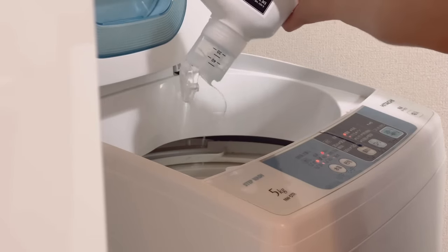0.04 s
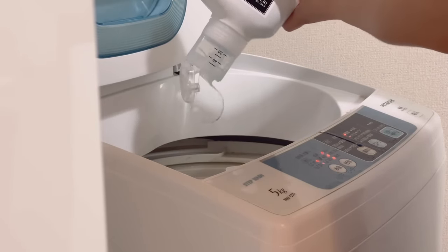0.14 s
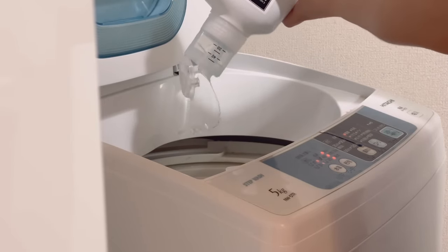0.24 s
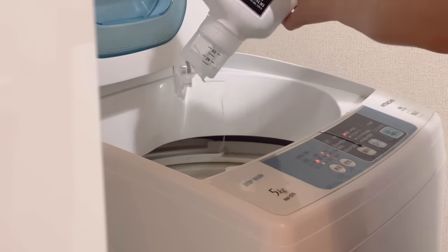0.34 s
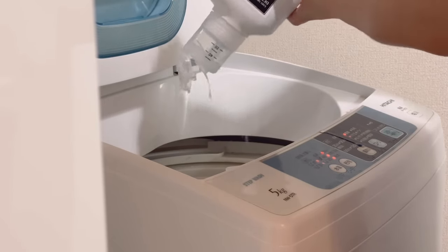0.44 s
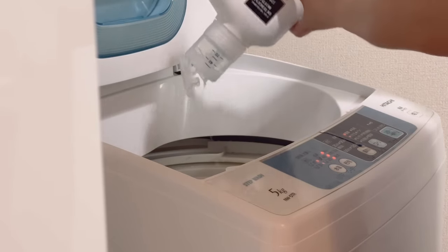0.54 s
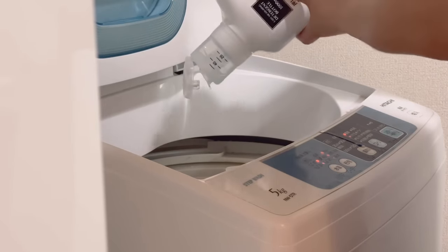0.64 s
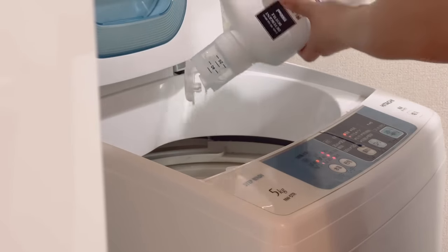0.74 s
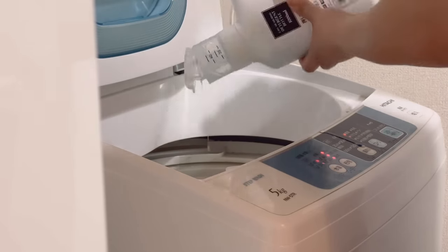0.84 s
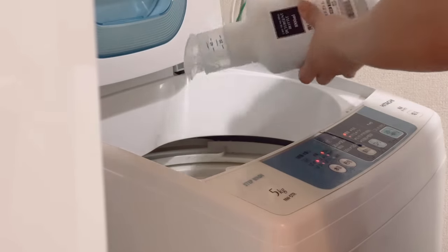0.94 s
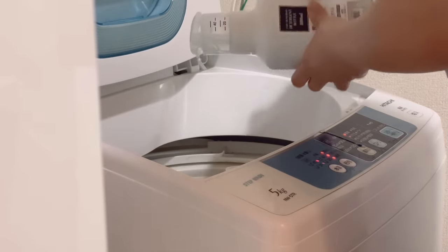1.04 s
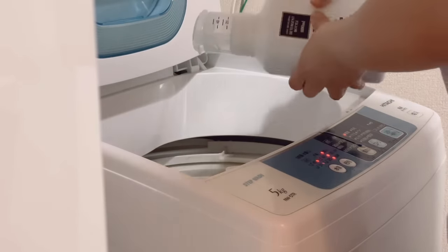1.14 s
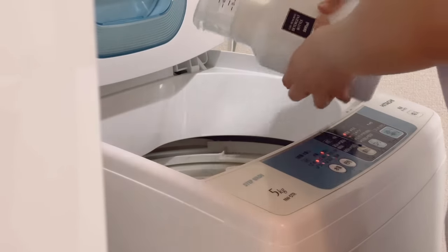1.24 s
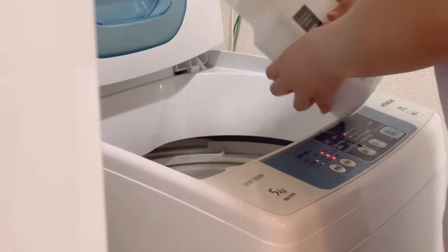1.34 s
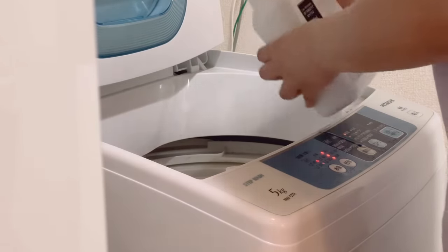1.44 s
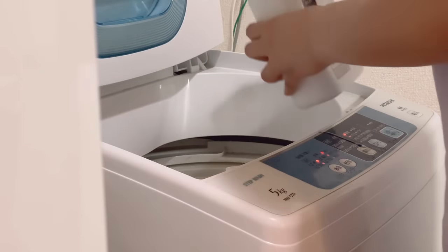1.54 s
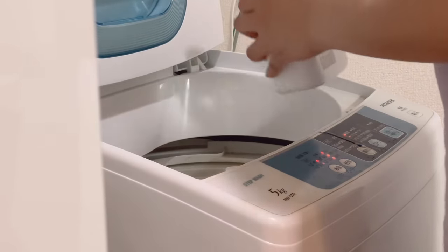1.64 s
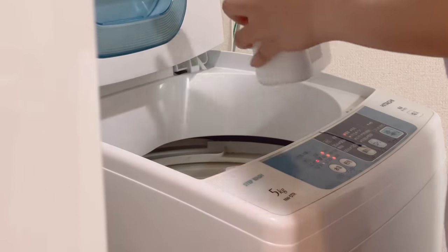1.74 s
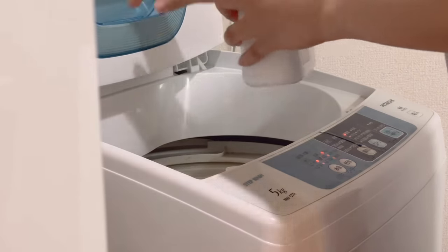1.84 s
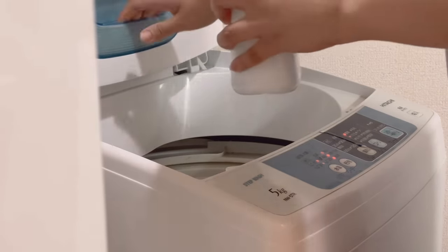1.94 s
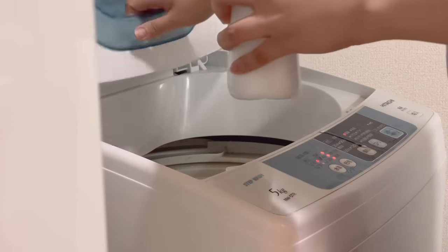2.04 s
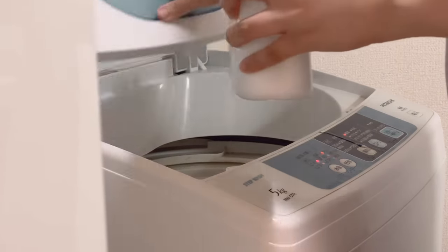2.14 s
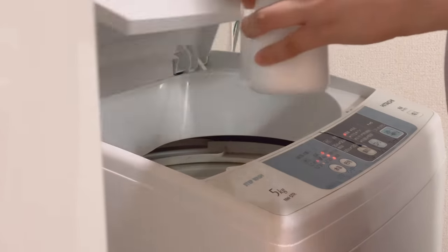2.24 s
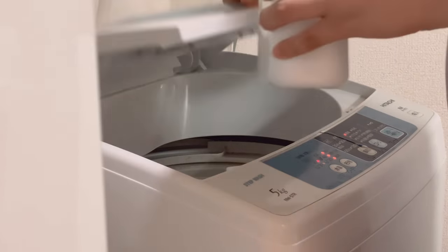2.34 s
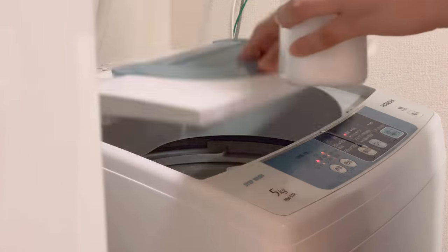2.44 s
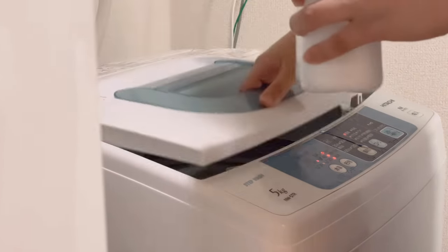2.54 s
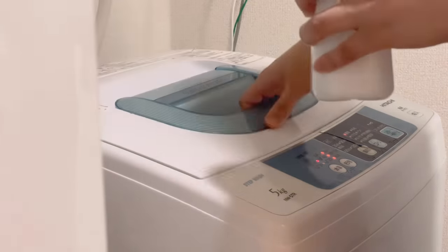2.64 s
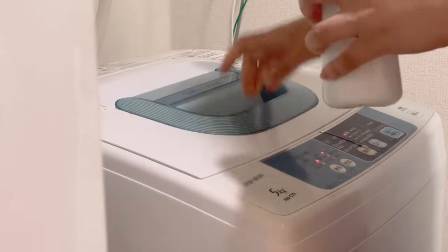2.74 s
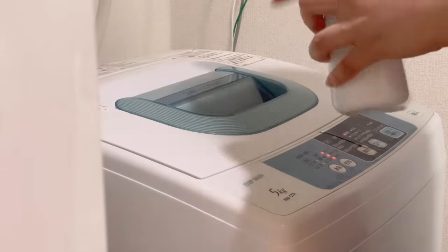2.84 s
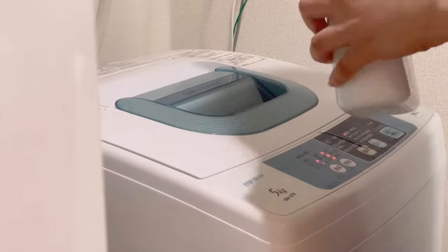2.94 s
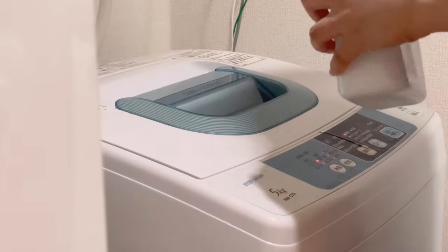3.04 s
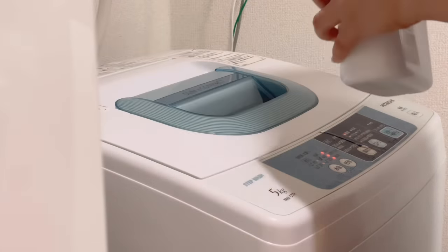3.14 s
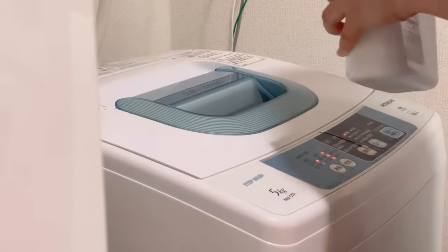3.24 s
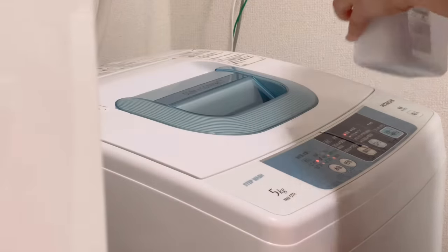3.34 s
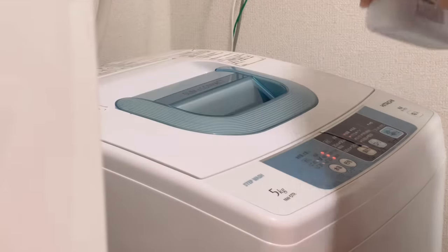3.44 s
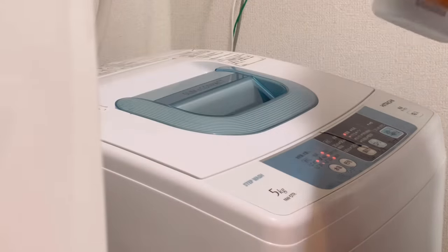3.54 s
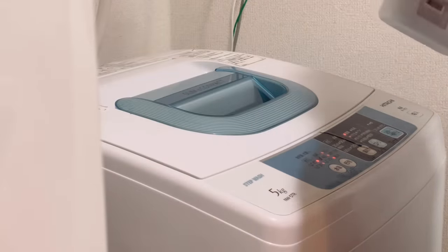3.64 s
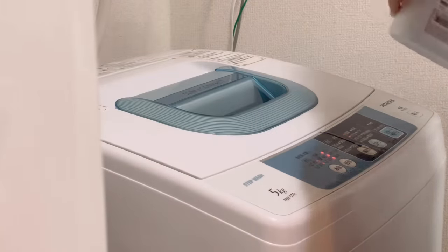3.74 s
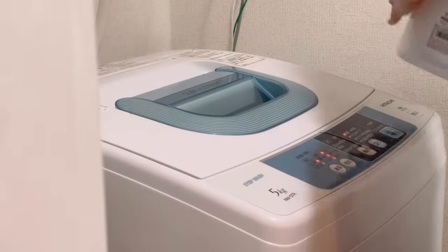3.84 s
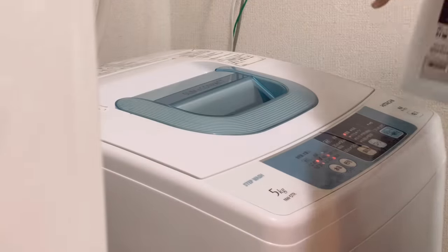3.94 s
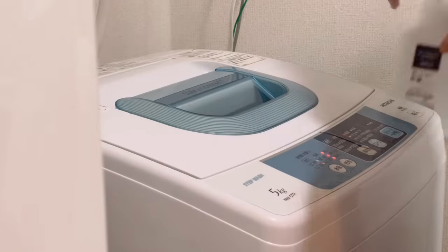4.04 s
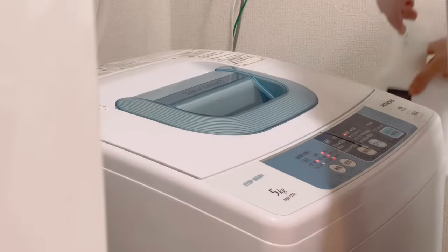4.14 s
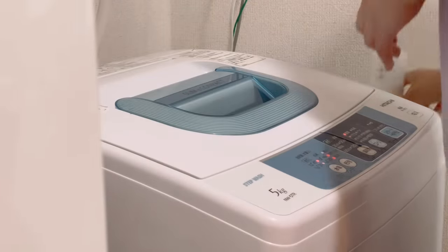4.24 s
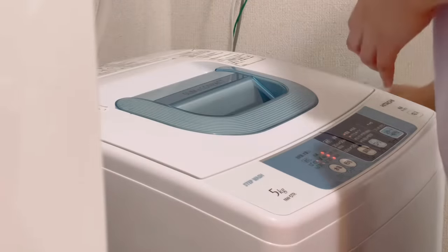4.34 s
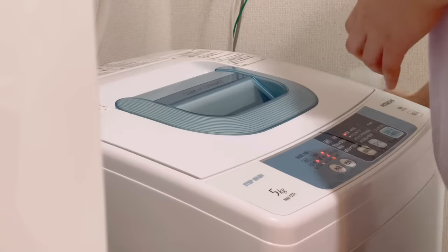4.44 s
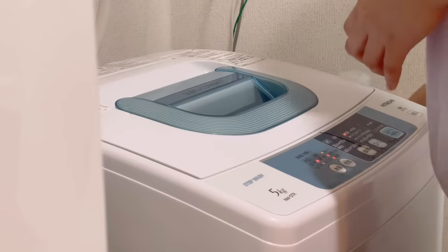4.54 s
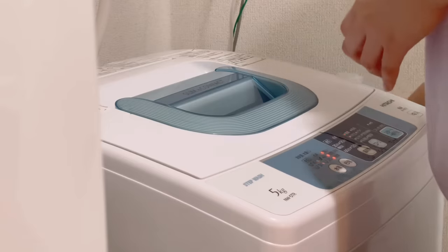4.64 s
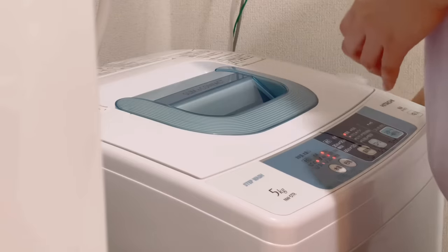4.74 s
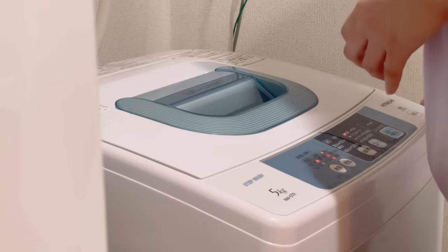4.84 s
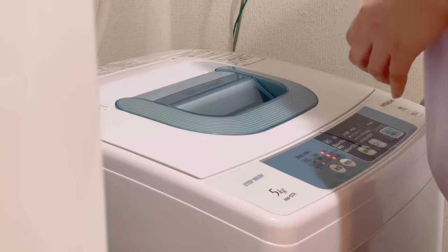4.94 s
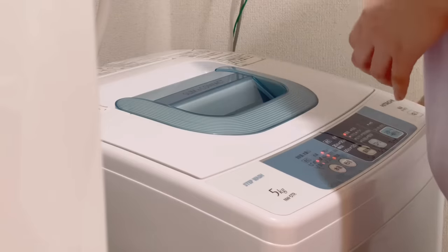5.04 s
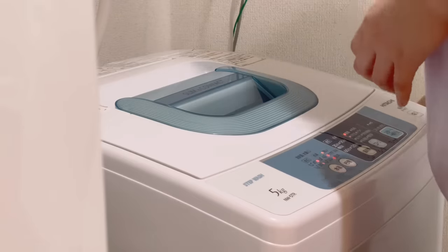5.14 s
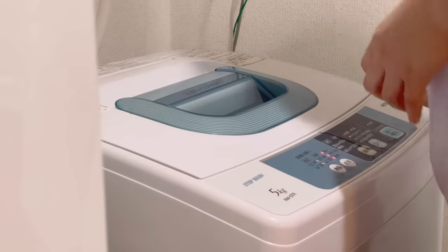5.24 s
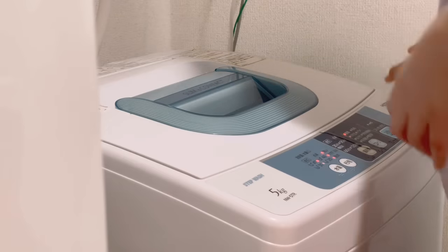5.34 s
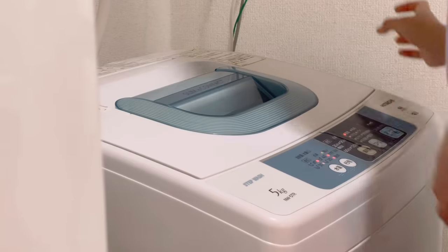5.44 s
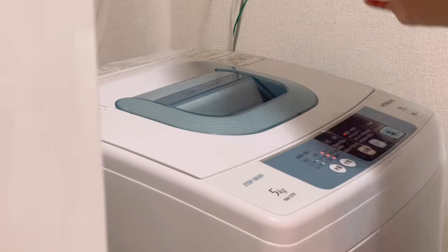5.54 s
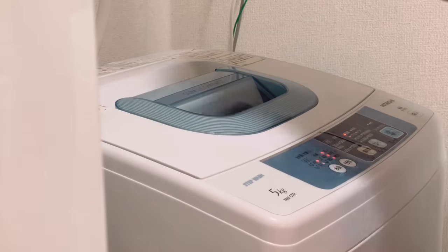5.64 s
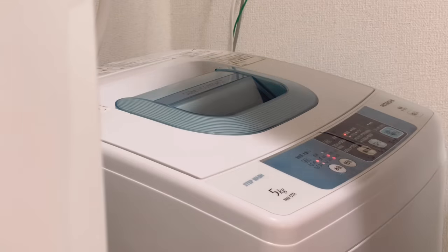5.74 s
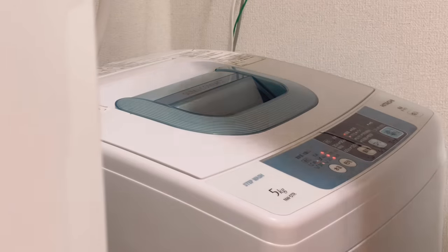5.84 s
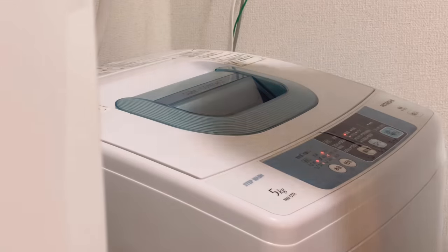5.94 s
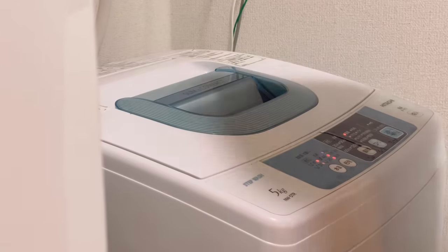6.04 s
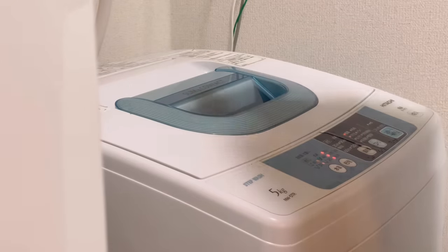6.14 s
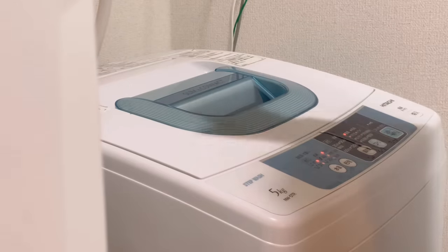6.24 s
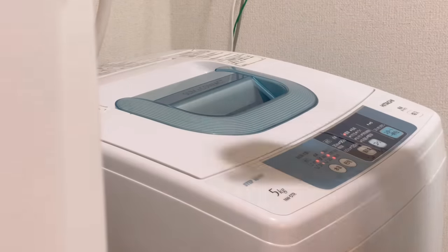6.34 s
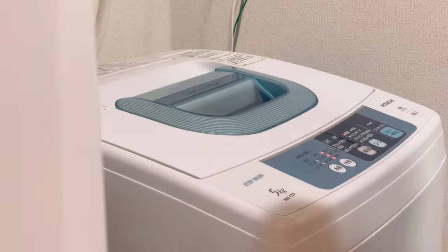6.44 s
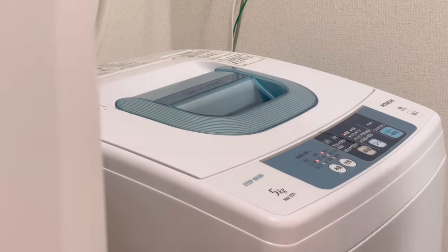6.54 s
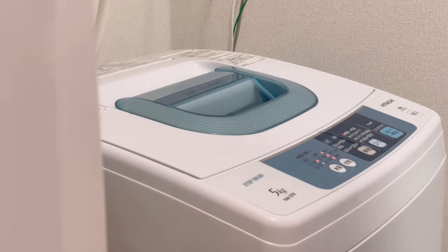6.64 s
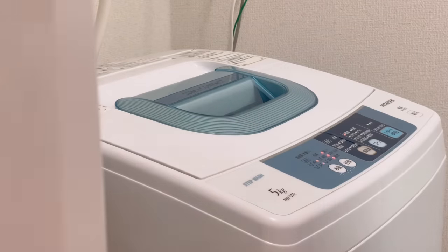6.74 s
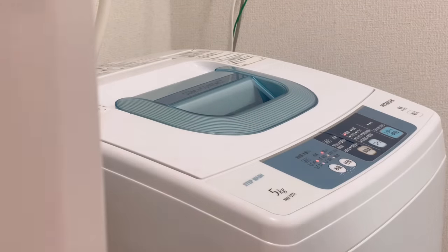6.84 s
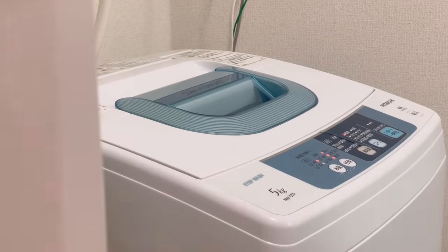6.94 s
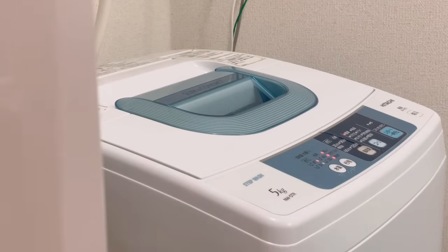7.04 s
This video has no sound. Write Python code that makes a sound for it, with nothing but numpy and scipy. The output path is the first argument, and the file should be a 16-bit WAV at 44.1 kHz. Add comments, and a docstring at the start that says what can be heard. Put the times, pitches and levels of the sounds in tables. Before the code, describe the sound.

A plastic bottle gulps and wheezes, a washing machine lid clatters shut, then water hoots briefly and sprays into the humming tub amid bumps and clicks.

```python
"""A plastic bottle gulps: bubbles ring as decaying tones, and air drawn through its spout hisses and whistles.
It knocks on a top-loading washing machine whose lid clatters shut: ringing modes and noise bands under each blow.
The inlet valve opens and the pipe hoots; coloured noise and small pings spray into the humming tub.
The bottle is put aside with dull bumps, rasps and clicks.
All is heard from a phone close by in a small, hard-walled laundry room, over a low rumble."""
import sys
import numpy as np
from scipy import signal
from scipy.fft import rfft, irfft, next_fast_len
from scipy.io import wavfile
from scipy.ndimage import uniform_filter1d

SR = 44100
rng = np.random.default_rng(int(sys.argv[2]) if len(sys.argv) > 2 else 0)


def master_out(mix):
    """Clip the mix to full scale and print it as 16-bit PCM to the path in sys.argv[1]."""
    frames = np.transpose(np.atleast_2d(mix))
    ceiling = np.clip(frames, -1, 1)
    pcm = np.round(ceiling * 32767).astype(np.int16)
    wavfile.write(sys.argv[1], SR, pcm)


N = 313110
T = np.arange(N) / SR  # the time line in seconds

# Spectrum of the room's background. Each row: frequency in Hz, relative density in dB per Hz.
ROOM = [(25, -19), (55, -5.5), (125, -5.5), (200, -8), (270, -14), (370, -15.5), (520, -20), (900, -32.5),
        (2000, -44.5), (5000, -50), (9000, -59), (13600, -44.5), (15500, -51)]
ROOM_DB = -51

# The microphone pair. Each row: frequency in Hz, left minus right in dB, diffuse side share in dB.
PORTS = [(59, 2.5, -16), (202, 4.5, -12), (382, 4.5, -7), (730, 3, 0.5), (1420, 1.5, -13.5),
         (2220, -1, -23), (4750, 0.5, -7.5), (10100, -0.5, 9.5), (14900, 0, -31.5)]
TOP_HZ = 15600  # top of the heard range

# The inlet valve opens, spurts while the standing pressure escapes, then runs steadily.
VALVE_S, VALVE_RISE_S = 2.972, 0.015
SPURT_S, SPURT_DB = 0.16, 2.5
# Strength of the steady jet. Each row: time in seconds, level in dB.
FLOW = [(3.2, -44.5), (4.7, -42.5), (5.9, -44.5), (7.1, -44.5)]
# Trim of the spray's treble. Each row: time in seconds, gain in dB.
SPRAY_TREBLE = [(3.0, -1), (5.8, .5), (6.1, -5.5), (6.8, 0.5), (7.1, -3.5)]
# Spectrum of the jet's splash. Each row: frequency in Hz, relative density in dB per Hz.
SPRAY = [(260, -27), (450, 1.5), (640, -5), (960, -5), (1300, -9.5), (2000, -7), (3050, -4.5),
         (3600, -11.5), (4500, -12.5), (5800, -15), (6900, -11), (8100, -28), (10500, -21.5),
         (13800, -15.5), (15500, -22.5)]
SPRAY_FLICKER_DB, SPRAY_FLICKER_PER_S = 1.1, 18
# Low body of the water in the tub. Each row: frequency in Hz, relative density in dB per Hz.
TUB = [(18, -47), (30, -34), (59, -6.5), (118, -1), (151, -1), (283, -6.5), (433, -6.5), (536, -32),
       (600, -29), (780, -83), (1320, -120)]
# Tub resonances the water drums on. Each row: frequency in Hz, width in Hz, relative level in dB.
DRUM = [(53.3, 1.7, 3.5), (158.4, 2.4, 2.5), (215.8, 12, 0.5), (257, 51, -10), (358, 15.5, -1),
        (432.5, 17, -6), (580.5, 7, -3), (940, 6.7, -6), (1152, 11, -15), (1560, 34, -26),
        (1702, 24, -12.5), (2640, 48, -12.5)]
# Pitch range of the small drops, and their level beside the other water layers.
PATTER_LOW_HZ, PATTER_HIGH_HZ, PATTER_DB = 750, 4000, -10
# Single drops ticking on the tub. Each row: start in seconds, level in dB, pitch in Hz.
DRIPS = [(5.850, -47, 3780), (6.220, -66, 4600), (6.338, -58, 5200), (6.868, -47, 5130),
         (6.960, -52.5, 5600)]

# The machine hums while the valve is open; its lower tone swells once.
HUM_HZ, HUM_DB = 156.2, -53
UPPER_HUM_HZ, UPPER_HUM_DB = 213, -58
HUM_SWELL_S, HUM_SWELL_LENGTH_S, HUM_SWELL_DB = 5.5, 0.85, 5

# The inlet pipe gives one throbbing hoot as it fills; the pitch given is that at the peak.
HOOT_HZ, HOOT_DB = 750, -29.5
HOOT_PEAK_S, HOOT_LENGTH_S = 3.05, .18
HOOT_RISE_HZ_PER_S = 250
THROB_HZ, THROB_DB = 28.3, 11  # rate and depth
HOOT_UPPER_HZ, HOOT_UPPER_S = 1960, 0.073  # final pitch and length of the upper whistle
HOOT_BEND_HZ, HOOT_BEND_S = 814, 0.028  # how far below it starts, and the time constant of the bend
# Breathy upper resonances of the pipe. Each row: frequency in Hz, width in Hz, relative level in dB.
PIPE = [(1520, 80, -2), (1947, 70, 5), (3060, 90, -4)]

# Short rasps of spitting water and scraping plastic. Each row: start in seconds, level in dB,
# rise time constant in seconds, t60 in seconds, treble tilt in dB.
RASPS = [(1.915, -53.5, 0.0044, 0.32, 19), (2.988, -33, 0.023, 0.14, -14), (3.014, -35, 0.0023, 0.2, 7),
         (3.084, -26.5, 0.0027, 0.083, -2), (4.856, -32, 0.0014, 0.32, -9), (4.917, -28, 0.0046, 0.18, 26),
         (5.053, -26.5, 0.011, 0.26, 18), (5.094, -30, 0.0055, 0.13, 30), (5.121, -30.5, 0.003, 0.12, 31),
         (5.796, -59, .003, .12, 1), (6.445, -40.5, .004, 0.18, 9), (6.783, -44, .001, 0.055, 44)]
# Spectrum of the grit. Each row: frequency in Hz, relative density in dB per Hz.
RASP = [(250, 10.5), (700, 3.5), (1100, 0.5), (1700, 3), (3000, -3), (5000, -9), (7000, -11), (9000, -25.5),
        (12500, -13.5), (15500, -18.5)]
# Sliding strokes of hand and lid as the lid unfolds. Each row: start in seconds, length in seconds,
# level in dB, skew (over 1 peaks late).
SLIDES = [(1.901, 0.3, -55, 1), (2.09, 0.33, -51.5, 1.9), (2.41, 0.17, -64, 1)]
# Sharp clicks of plastic edges. Each row: start in seconds, level in dB, treble tilt in dB, ring in dB.
CLICKS = [(3.087, -33.5, 0, -2.5), (4.856, -36.5, -6, -0.5), (4.922, -29, 31, -11), (5.064, -35, 18, -3),
          (5.0993, -36, 31, -9), (5.1228, -31, 31, -8.5)]
# What a plastic edge rings with. Each row: frequency in Hz, width in Hz, relative level in dB.
EDGE = [(1646, 70, 2.5), (2230, 75, 1), (2906, 100, -1), (4500, 130, -7)]

# The full bottle bumping on its shelf. Each row: start in seconds, level in dB, shelf boom in dB.
BUMPS = [(4.506, -21, -0.5), (4.566, -42, 12), (4.728, -29, -22), (4.743, -30.5, -20), (4.871, -29, -16),
         (5.039, -25, -19), (5.057, -36, -11)]
# What a bump rings with. Each row: frequency in Hz, relative level in dB, t60 in seconds.
BOTTLE_BODY = [(53.4, -18.5, 0.65), (98, -10.5, 0.35), (133.6, 0, 0.1), (238.7, 4, 0.073),
               (264.3, 0.5, 0.093), (311, -11, 0.13), (478, -9.5, 0.062)]

# The lid drops into its seat and the hollow cabinet booms.
# Each row: frequency in Hz, level in dB, t60 in seconds.
BOOM = [(203.6, -9.5, 0.117), (216.9, -22, 0.51), (258, -32.5, 0.32), (386, -35.5, 0.39)]
BOOM_S, BOOM_RISE_S = 2.722, 0.0091
# The hollow bottle rings as it knocks on the cabinet.
# Each row: frequency in Hz, level in dB, t60 in seconds.
HOLLOW = [(128.5, -30, 0.31), (164.3, -34, .35), (515, -29, 0.15), (587, -32, .13), (773, -35, .1)]
HOLLOW_S, HOLLOW_RISE_CYCLES = 1.379, 1.5

# Blows on the plastic cabinet and lid. Each row: start in seconds, level in dB, bass tilt in dB,
# treble tilt in dB, ring length factor, deep thump in dB.
KNOCKS = [(1.181, -52, -12, -15, 0.3, 0), (1.271, -67, 22, 22, 1, -7), (1.378, -35, 3, -1, 0.76, 0),
          (1.403, -46, 8.5, 12, 0.69, 21.5), (1.951, -32.5, -35, -31, 0.69, 0),
          (1.986, -36, -6.5, 2.5, 0.65, -1), (2.093, -50.5, -15, -10, 0.38, -1),
          (2.382, -33, -9, -25, 0.77, 10.5), (2.526, -22.5, -15, 3.5, 0.68, 8),
          (2.532, -18.5, -4, -9.5, 0.68, 5), (2.611, -26, -11.5, 15.5, 0.69, 22),
          (2.658, -17, -3.5, -27, 1, -3.5), (2.680, -16, 0.5, -16, 0.67, -9),
          (2.690, -25.5, -5, -11, 0.42, -2), (4.854, -33, -3.5, -6, 0.3, -4),
          (6.4, -47, 21.5, -15, 0.18, 0)]
# The shut lid is damped by its frame: when, largest share of ring time lost, and around which pitch.
LID_SHUT_S, SHUT_DAMPING, LID_HZ = 2.64, .25, 1100
# Modes of the struck cabinet. Each row: frequency in Hz, relative level in dB,
# t60 in seconds at ring length factor 1 and without lid damping.
CABINET = [(56.7, -10, 0.3), (73.2, -14, 0.5), (106.8, -2, 0.98), (161.3, -3, 0.78), (201.9, 3, 0.56),
           (221.8, 4, 0.69), (257.3, 4.5, 0.3), (333, 2, 0.47), (370, 9, 0.4), (460, 12.5, 0.086),
           (462, 1.5, 0.46), (541, 2.5, 0.25), (632.7, -2.5, 0.45), (650, -8, 0.18), (747, -1, 0.18),
           (870, -14, 0.13), (904, -1.5, .22), (982, 3.5, 0.17), (1036, 1.5, 0.24), (1169, 1.5, 0.12),
           (1287, -7, 0.3), (1460, -1, 0.14), (1590, -3, 0.16), (1850, -6.5, .2), (2120, 1, 0.14),
           (2150, -7, 0.045), (2496, -7.5, 0.22), (2830, -9, 0.26), (3880, -22, 0.37), (4620, -16, 0.17)]
# The dense ring of panels and room. Each row: frequency in Hz, relative density in dB per Hz,
# t60 in seconds at ring length factor 1 and without lid damping.
PANELS = [(35, -12, 0.38), (59, 8, 0.67), (123, -10.5, 1), (297, -2.5, 0.52), (590, -5.5, 0.35),
          (1060, -9, 0.39), (1960, -13.5, 0.32), (3720, -19.5, 0.22), (6600, -33, 0.35),
          (9200, -45.5, 0.19), (14200, -38.5, 0.31)]

# Bubbles gulping into the bottle. Each row: start in seconds, level in dB, starting pitch in Hz,
# seconds until the bubble breaks away, slap in dB.
GULPS = [(0.26, -47, 517, 0.011, -5), (.356, -35, 682, 0.032, -4), (.387, -29, 689.6, 0.067, -7),
         (.451, -27, 699, 0.04, -3.5), (0.509, -26.5, 704, 0.034, -5)]
# The wet slap of a bubble in the liquid. Each row: frequency in Hz, width in Hz, relative level in dB.
SLAP = [(380, 36, 17), (507, 45, 18), (945, 140, -14), (1470, 70, -9)]
SLAP_T60_S, GULP_WOBBLE_DB = 0.085, 1.6

# Air drawn through the spout as the bottle springs back. Each row: time in seconds, level in dB
# before the surges.
DRAW = [(0, -62), (.11, -71), (.16, -66), (.23, -85), (.29, -67), (.35, -53), (.47, -50), (.57, -52.5),
        (.66, -48.5), (.76, -54), (.81, -62), (.86, -85)]
DRAW_SURGE_DB, DRAW_SURGE_T60_S = 3, 0.53  # each bubble lets a little more air through
# Narrow whistles of the spout. Each row: frequency in Hz once clear, relative level in dB.
SPOUT = [(511, 5), (692, 12), (1580, -5), (2240, -10), (2670, -7), (2975, -5), (3180, -1), (3580, 2),
         (3800, -8), (4300, 3), (6350, -6), (6800, -10), (7000, -5), (8120, -9), (10060, -13), (11290, -8)]
# Spectrum of the spout's hiss. Each row: frequency in Hz, relative density in dB per Hz.
SPOUT_HISS = [(300, -35), (2000, -4), (3000, 4), (4200, 4), (4700, -4), (6000, -3.5), (7000, 6), (7600, -9),
              (8200, -7), (11000, -3), (15500, 0.5)]
SPOUT_CLEAR_S, SPOUT_CLEARING_S = 0.47, 0.078  # when and how quickly the last liquid leaves the spout
SPOUT_WET_FLAT = .012  # share by which liquid in the spout lowers its whistles
WHISTLE_DB, CLEAR_HISS_DB = -0.5, -7  # whistle trim, and change of the hiss once clear
SPOUT_DRY_S, SPOUT_DULL_DB_PER_S = 0.49, 61  # the finest hiss dies away as the spout dries


def undb(db):
    """Decibels to gain."""
    return 10 ** (np.asarray(db) / 20)


def unit(x):
    """Scale to rms 1."""
    return x / np.sqrt(np.mean(x ** 2))


def widen(x, side):
    """Weigh x as mid at full level and side at the given share."""
    return x * np.array([[1], [side]])


def curve(rows):
    """A short time table, per sample."""
    return np.interp(T, *np.transpose(rows))


def across(rows, hz, axis=1):
    """One column of a frequency table, read on a log axis."""
    rows = np.array(rows)
    return np.interp(np.log(hz + 1), np.log(rows[:, 0]), rows[:, axis])


def shape(x, response):
    """Filter by a gain that is a function of frequency."""
    count = x.shape[-1]
    size = next_fast_len(count + 4096)
    hz = np.arange(size // 2 + 1) * SR / size
    return irfft(rfft(x, size) * response(hz), size)[..., :count]


def colour(x, rows):
    """Give x a spectrum, at rms 1."""
    return unit(shape(x, lambda hz: undb(across(rows, hz))))


def resonate(x, rows):
    """Pass x through parallel resonances, at rms 1."""
    def response(hz):
        return sum(undb(db) / (1 + 1j * (hz ** 2 - f ** 2) / (hz * width + 1e-9)) for f, width, db in rows)
    return unit(shape(x, response))


def treble(hz):
    """Share of a frequency that counts as treble."""
    return hz ** 2 / (hz ** 2 + 2800 ** 2)


def bass(hz):
    """Share of a frequency that counts as bass."""
    return 1 / (1 + (hz / 400) ** 3)


def steep_highpass(hz, corner_hz):
    """Gain that passes only what lies above the corner."""
    return hz ** 8 / (hz ** 8 + float(corner_hz) ** 8)


def noise(size=N):
    """Unrelated noise for mid and side."""
    return rng.standard_normal((2, size))


def grains(spread_db, size=N):
    """Dense tiny impacts of very unequal size."""
    sizes = np.minimum(rng.exponential(size=size), 8)
    return unit(noise(size) * undb(spread_db * sizes))


def walk(rate):
    """Smooth random wander at rms 1, with about rate new targets a second."""
    k = int(SR / rate)
    steps = np.repeat(rng.standard_normal(N // k + 1), k)
    return unit(uniform_filter1d(uniform_filter1d(steps, k), k)[:N])


def fade(t, t60):
    """Exponential ring-down."""
    return np.exp(-np.log(1000) * t / t60)


def arch(start, length, skew=1, point=1):
    """One swell from 0 to 1 and back; skew under 1 peaks early, point over 1 narrows the top."""
    progress = np.clip((T - start) / length, 0, 1)
    return np.abs(np.sin(np.pi * progress ** skew)) ** point


def add(out, start, x):
    """Mix x into out from a start time."""
    i = int(start * SR)
    out[:, i:i + x.shape[1]] += x[:, :N - i]


def walls(x, echo_db=-13, count=12):
    """Early reflections of the small room comb the sound, a little differently for mid and side."""
    taps = np.zeros((2, 2000))
    taps[:, 0] = 1
    for row in taps:
        row[rng.integers(100, 2000, count)] = undb(echo_db) * rng.choice([-1, 1], count)
    return signal.fftconvolve(x, taps / np.linalg.norm(taps[0]), axes=1)[:, :N]


def flicker(x, depth_db, rate):
    """Let each octave of x wander in level on its own."""
    centres = np.log(250 * 2 ** np.arange(7))
    out = 0
    for row in np.eye(len(centres)):
        band = shape(x, lambda hz: np.interp(np.log(hz + 1), centres, row))
        out = out + band * undb(depth_db * walk(rate))
    return unit(out)


def room():
    """Low household rumble under a faint hiss."""
    swell_db = 1.0 * walk(5)
    return colour(noise(), ROOM) * undb(ROOM_DB + swell_db)


def hum(wander_db=1.5, drift_hz=0.77):
    """Two low, slightly unsteady tones from the running machine; the lower one swells once."""
    def tone(hz, db):
        phase = 2 * np.pi * np.cumsum(hz + drift_hz * walk(8)) / SR
        return unit(np.sin(phase)) * undb(db + wander_db * walk(10))
    swell_db = HUM_SWELL_DB * arch(HUM_SWELL_S, HUM_SWELL_LENGTH_S, skew=0.42)
    return tone(HUM_HZ, HUM_DB + swell_db) + tone(UPPER_HUM_HZ, UPPER_HUM_DB)


def hoot(waver_hz=10, overtone_db=-14, upper_db=-15):
    """Air pushed ahead of the water throbs in the filling pipe, rising; an upper whistle bends up."""
    slide = np.clip(T - HOOT_PEAK_S, -HOOT_LENGTH_S, HOOT_LENGTH_S)
    pitch = HOOT_HZ + HOOT_RISE_HZ_PER_S * slide
    tone = np.sin(2 * np.pi * np.cumsum(pitch + waver_hz * walk(120)) / SR)
    tone = tone + undb(overtone_db) * resonate(noise(), PIPE)
    # the squared sine throbs at THROB_HZ
    throb_db = -THROB_DB * np.sin(np.pi * THROB_HZ * (T - HOOT_PEAK_S)) ** 2
    swell = arch(HOOT_PEAK_S - HOOT_LENGTH_S / 2, HOOT_LENGTH_S, point=2.4)
    bend = HOOT_UPPER_HZ - HOOT_BEND_HZ * np.exp(-np.maximum(T - VALVE_S, 0) / HOOT_BEND_S)
    upper = np.sin(2 * np.pi * np.cumsum(bend + 9 * waver_hz * walk(500)) / SR)
    upper = upper * arch(VALVE_S, HOOT_UPPER_S)
    return (tone * swell * undb(throb_db) + undb(upper_db) * upper) * undb(HOOT_DB + 2 * walk(130))


def patter(count=2400, spread_db=3.0, cycles=22):
    """Small drops in the tub, each a brief ping at its own pitch."""
    out, t = np.zeros((2, N)), T[:1500]
    for when, pitch, size, place in rng.random((count, 4)):
        hz = PATTER_LOW_HZ * (PATTER_HIGH_HZ / PATTER_LOW_HZ) ** pitch
        gain = undb(spread_db * min(-np.log(1 - size), 3))  # a few drops are much bigger
        ping = np.sin(2 * np.pi * hz * t) * fade(t, cycles / hz) * gain
        add(out, when * T[-1], widen(ping, 2 * place - 1))
    return unit(walls(out))


def filling(spray_db=-5.0, tub_db=-4, drum_db=-6):
    """Water sprays, patters and drums in the tub; the pipe hoots once and the machine hums."""
    spray = walls(colour(grains(spread_db=2.0), SPRAY))
    spray = flicker(spray, SPRAY_FLICKER_DB, SPRAY_FLICKER_PER_S)
    # the finest splashes come and go as the jet shifts
    fine = shape(spray, lambda hz: steep_highpass(hz, 3400))
    spray = spray + (undb(curve(SPRAY_TREBLE)) - 1) * fine
    tub = colour(noise(), TUB) * undb(1.0 * walk(9))
    drumming = resonate(noise(), DRUM)
    water = undb(spray_db) * spray + undb(PATTER_DB) * patter()
    water = water + undb(tub_db) * tub + undb(drum_db) * drumming
    opening = np.clip((T - VALVE_S) / VALVE_RISE_S, 0, 1) ** 2
    jet = undb(curve(FLOW) + SPURT_DB * arch(VALVE_S, SPURT_S))
    return opening * (water * jet + widen(hum() + hoot(), .2))


def drips(t60=0.091, width_hz=500):
    """Larger drops tick on the tub as short bursts of resonant noise."""
    out, t = np.zeros((2, N)), T[:6000]
    for start, db, hz in DRIPS:
        tick = resonate(noise(len(t)), [(hz, width_hz, 0)])
        add(out, start, undb(db) * fade(t, t60) * tick)
    return out


def gritty(hz, treble_db):
    """Gain of scraped plastic or spitting water, tilted in the treble."""
    return undb(across(RASP, hz) + treble_db * treble(hz / 2))


def rasps():
    """Short gritty bursts, and the soft slide of the unfolding lid."""
    t = T[:13000]
    strokes = sum(undb(db) * arch(start, length, skew, point=0.93) for start, length, db, skew in SLIDES)
    catches = grains(spread_db=3.5) * undb(3.0 * walk(90))
    out = colour(catches, RASP) * strokes
    for start, db, rise, t60, treble_db in RASPS:
        grit = unit(shape(grains(spread_db=2.5, size=len(t)), lambda hz: gritty(hz, treble_db)))
        add(out, start, undb(db) * grit * (1 - np.exp(-t / rise)) * fade(t, t60))
    return walls(out, echo_db=-21.0)


def clicks(snap_t60=0.012, ring_t60=0.11):
    """Plastic edges catch and let go: a sharp snap and a brief ring."""
    out, t = np.zeros((2, N)), T[:6000]
    for start, db, treble_db, ring_db in CLICKS:
        snap = unit(shape(noise(len(t)), lambda hz: gritty(hz, treble_db))) * fade(t, snap_t60)
        ring = resonate(noise(len(t)), EDGE) * fade(t, ring_t60)
        add(out, start, undb(db) * (snap + undb(ring_db) * ring))
    return out


def bumps(contact_s=0.0041):
    """Dull, short thuds of a liquid-filled bottle, each with its own share of shelf boom."""
    out, t = np.zeros((2, N)), T[:13000]
    for start, db, boom_db in BUMPS:
        ring = 0
        for f, mode_db, t60 in BOTTLE_BODY:
            gain = undb(mode_db + boom_db * bass(3 * f))
            ring = ring + gain * fade(t, t60) * np.sin(2 * np.pi * f * t)
        add(out, start, widen(undb(db) * (1 - np.exp(-t / contact_s)) * ring, .4))
    return out


def boom():
    """A round, short boom as the lid seats, with a faint ring after it."""
    out, t = np.zeros((2, N)), T[:24000]
    ring = sum(undb(db) * fade(t, t60) * np.sin(2 * np.pi * hz * t) for hz, db, t60 in BOOM)
    add(out, BOOM_S, widen(ring * np.minimum(t / BOOM_RISE_S, 1), .3))
    return out


def hollow():
    """The knocked bottle answers with a short, hollow ring; its low modes build up last."""
    out, t = np.zeros((2, N)), T[:20000]
    ring = 0
    for hz, db, t60 in HOLLOW:
        swell = 1 - np.exp(-t * hz / HOLLOW_RISE_CYCLES)
        ring = ring + undb(db) * swell * fade(t, t60) * np.sin(2 * np.pi * hz * t)
    add(out, HOLLOW_S, widen(ring, .3))
    return out


def damping(start, hz):
    """Ring-time factor: once the lid lies in its frame, its midrange dies sooner."""
    return 1 - (start > LID_SHUT_S) * SHUT_DAMPING * np.exp(-np.log2(hz / LID_HZ) ** 2)


def half_octave(x, centre_hz):
    """One band of x around a centre, at rms 1."""
    return unit(shape(x, lambda hz: 1 / np.sqrt(1 + (4 * np.log2((hz + 1) / centre_hz)) ** 8)))


def knocks(modes_db=-10, panels_db=-4, crack_db=-3, bloom_cycles=0.58, bloom_s=0.0022, crack_t60=0.018):
    """Each blow cracks, then rings the cabinet's modes and its dense panel ring; the lows build up late."""
    out, t = np.zeros((2, N)), T[:24000]
    centres = 40 * 2 ** (np.arange(18) / 2)
    white = noise()
    bands = [half_octave(white, f) for f in centres]
    # a band's power is its density times its width
    weights = undb(across(PANELS, centres)) * np.sqrt(centres)
    weights = weights / np.linalg.norm(weights)
    for start, db, bass_db, treble_db, length, thump_db in KNOCKS:
        i, ring = int(start * SR), np.zeros((2, len(t)))

        def tilt(f):
            """Soft, heavy contacts favour the lows, hard edges the treble."""
            return undb(bass_db * bass(f) + treble_db * treble(f) + thump_db * bass(2.24 * f))

        for f, band, weight in zip(centres, bands, weights):
            swell = 1 - np.exp(-t / (bloom_s + bloom_cycles / f))
            t60 = length * damping(start, f) * across(PANELS, f, axis=2)
            panel = undb(panels_db) * swell * fade(t, t60)
            crack = undb(crack_db) * treble(f) * fade(t, crack_t60)
            ring += weight * tilt(f) * (panel + crack) * band[:, i:i + len(t)]
        for f, mode_db, t60 in CABINET:
            # at every blow each mode is slightly detuned and starts at a random phase
            detuned = f * (1 + 0.0038 * rng.standard_normal())
            phase = 2 * np.pi * (detuned * t + rng.random((2, 1)))
            swell = 1 - np.exp(-t * f / bloom_cycles)
            envelope = swell * fade(t, length * damping(start, f) * t60)
            ring += undb(modes_db + mode_db) * tilt(f) * envelope * widen(np.sin(phase), .7)
        add(out, start, undb(db) * ring)
    return out


def whistles(ring_db=-3, hiss_db=-3, wet_db=-4, sputter_db=1.5):
    """The bottle springs back and draws air: the wet spout sputters and hisses, the clear one whistles more."""
    surge_db = 0
    for start, *_ in GULPS:
        surge_db = surge_db + DRAW_SURGE_DB * (T > start) * fade(np.abs(T - start), DRAW_SURGE_T60_S)
    draw = undb(curve(DRAW) + surge_db) * (T < DRAW[-1][0])
    cleared = .5 + .5 * np.tanh((T - SPOUT_CLEAR_S) / SPOUT_CLEARING_S)
    lines = 0
    for hz, db in SPOUT:
        # each whistle wavers in pitch and strength on its own
        flutter_db = 3.2 * walk(140) + 2.5 * walk(22)
        waver_hz = (12 + hz / 200) * walk(260)
        pitch = hz * (1 - SPOUT_WET_FLAT * (1 - cleared)) + waver_hz
        lines = lines + undb(db + flutter_db) * np.sin(2 * np.pi * np.cumsum(pitch) / SR)
    whistle = widen(undb(WHISTLE_DB + wet_db * (1.5 - cleared)) * unit(lines), .7)

    def peaks(f):
        """Turbulence rings the same narrow resonances, which widen with frequency."""
        return sum(undb(db) * np.exp(-((f - hz) / (30 + hz / 90)) ** 2) for hz, db in SPOUT)

    ringing = undb(ring_db + CLEAR_HISS_DB * cleared) * unit(shape(noise(), peaks))
    hiss = flicker(colour(grains(spread_db=3.0), SPOUT_HISS), 1.8, 51)
    hiss = walls(hiss, echo_db=-4) * undb(hiss_db + CLEAR_HISS_DB * cleared)
    air = (whistle + ringing + hiss) * draw * undb(sputter_db * walk(71.3))
    dull_db = -SPOUT_DULL_DB_PER_S * np.maximum(T - SPOUT_DRY_S, 0)
    finest = shape(air, lambda hz: steep_highpass(hz, 9000))
    return air + (undb(dull_db) - 1) * finest


def gulps(gulp_t60=0.3, sag=0.011, plop_db=-8, soft_hz=1500):
    """Each bubble slaps the liquid softly, then rings in the bottle until it breaks away."""
    out, t = np.zeros((2, N)), T[:13000]
    for start, db, hz, life, slap_db in GULPS:
        pitch = hz * (1 - sag * (1 - fade(t, 0.088)))  # sags as it rings
        phase = 2 * np.pi * np.cumsum(pitch) / SR
        tone = np.sin(phase) * fade(t, gulp_t60) * undb(GULP_WOBBLE_DB * walk(170)[:len(t)])
        plop = undb(plop_db) * np.sin(0.9 * phase) * fade(t, 0.067)
        push = shape(noise(len(t)), lambda f: 1 / (1 + (f / soft_hz) ** 4))
        slap = undb(slap_db) * resonate(push, SLAP) * fade(t, SLAP_T60_S)
        held = (1 - np.exp(-t / .002)) * fade(np.maximum(t - life, 0), .045)
        add(out, start, undb(db) * held * (widen(tone + plop, .3) + slap))
    return out


def bottle():
    """Whistling air and gulping bubbles."""
    return whistles() + gulps()


def scene():
    """All sources as mid and side, spread over the two microphone ports."""
    machine = filling() + drips() + boom() + knocks()
    handling = rasps() + clicks() + bumps() + hollow()
    mid, side = room() + machine + handling + bottle()
    side = shape(side, lambda hz: undb(across(PORTS, hz, axis=2)))
    left = shape(mid + side, lambda hz: undb(across(PORTS, hz) / 2))
    right = shape(mid - side, lambda hz: undb(-across(PORTS, hz) / 2))
    return np.array([left, right])


def record(dry):
    """The phone rounds the loudest peaks and cuts the top."""
    rounded = np.tanh(1.46 * dry) / 1.51
    # order 10, 0.2 dB ripple, 80 dB rejection
    lowpass = signal.ellip(10, .2, 80, TOP_HZ, fs=SR, output="sos")
    return signal.sosfilt(lowpass, rounded)


dry = scene()
out = record(dry)
master_out(out)
```